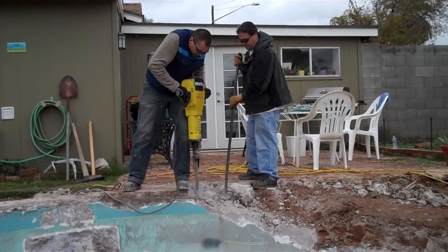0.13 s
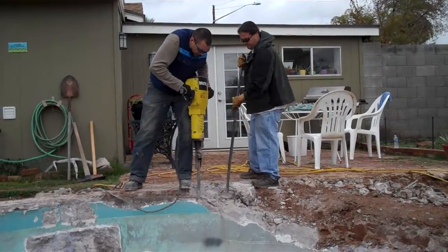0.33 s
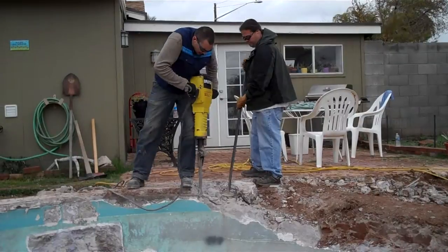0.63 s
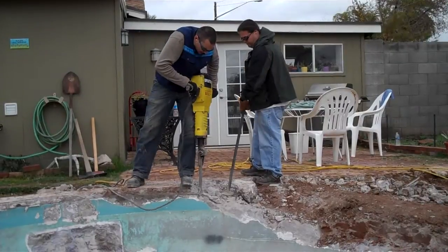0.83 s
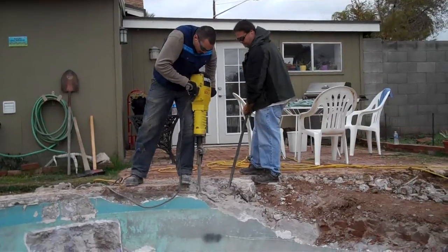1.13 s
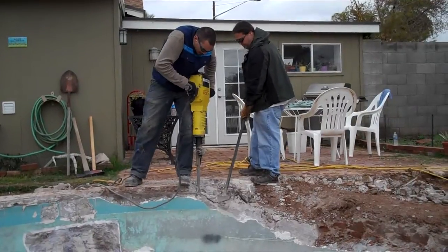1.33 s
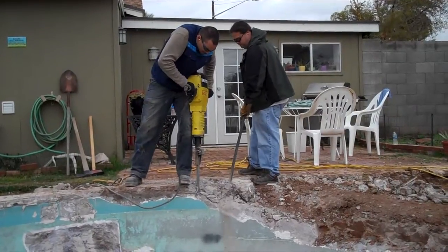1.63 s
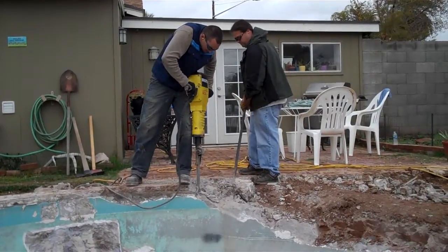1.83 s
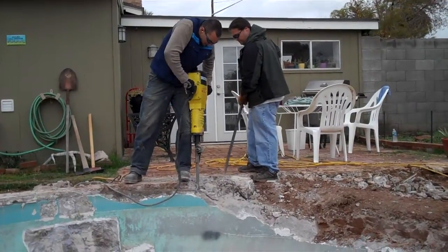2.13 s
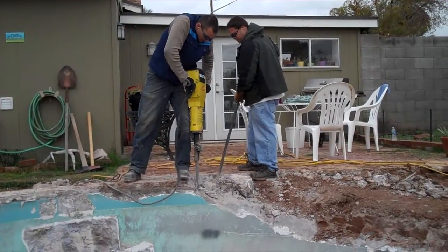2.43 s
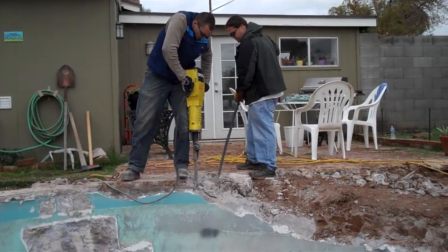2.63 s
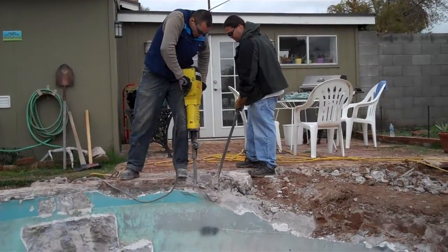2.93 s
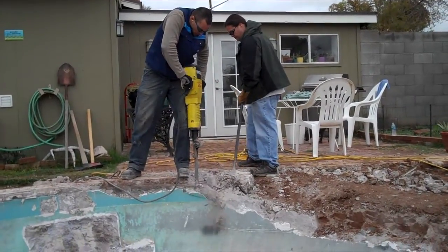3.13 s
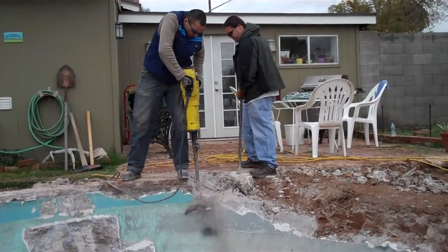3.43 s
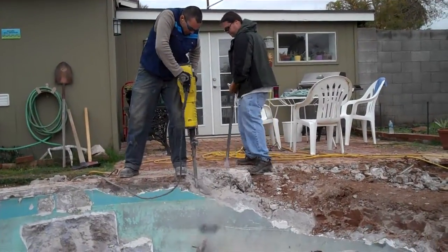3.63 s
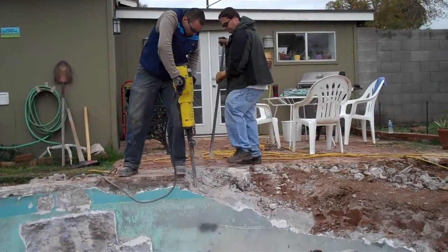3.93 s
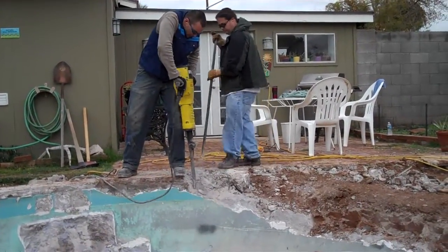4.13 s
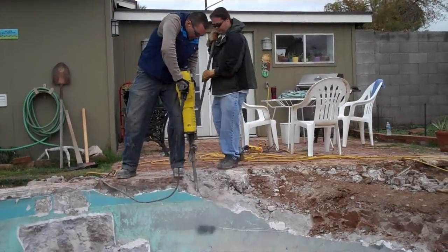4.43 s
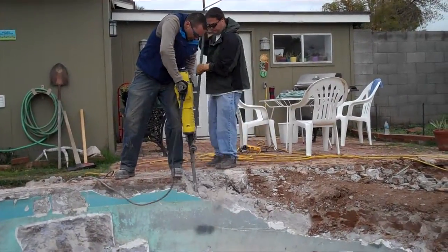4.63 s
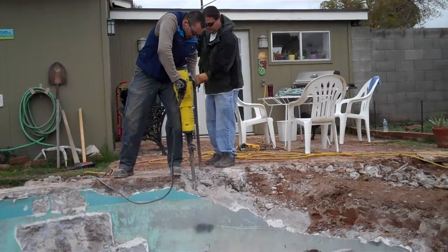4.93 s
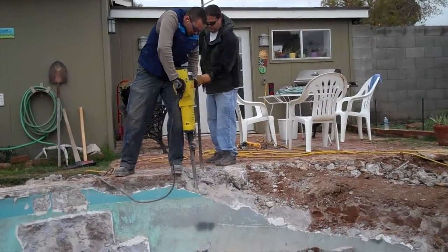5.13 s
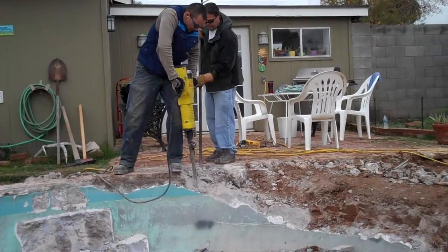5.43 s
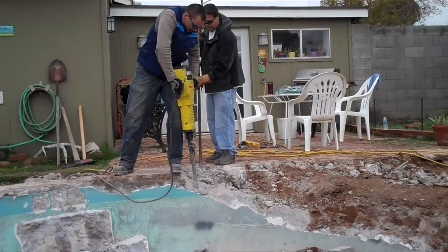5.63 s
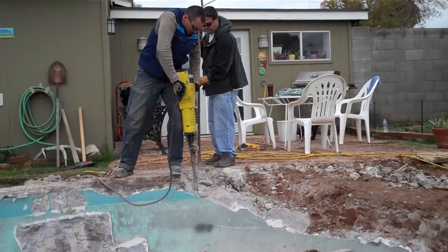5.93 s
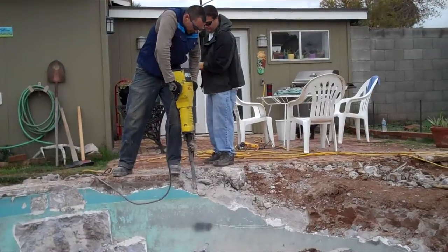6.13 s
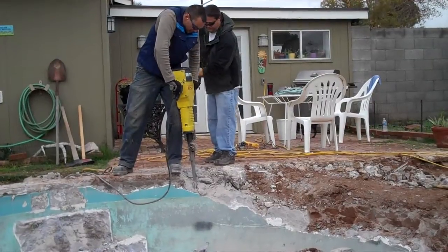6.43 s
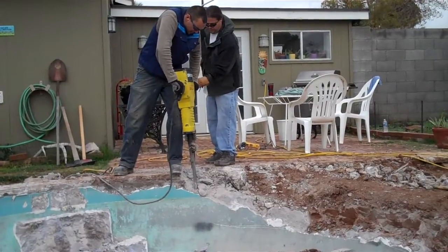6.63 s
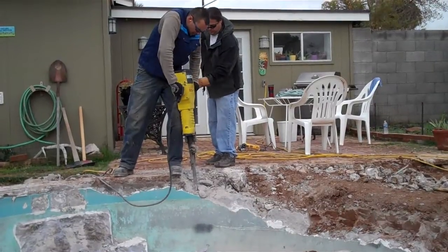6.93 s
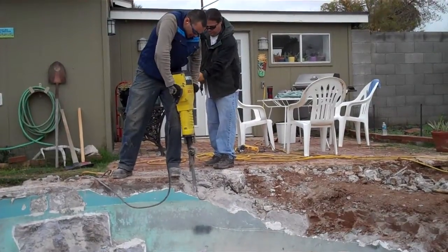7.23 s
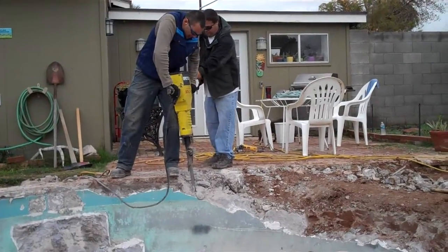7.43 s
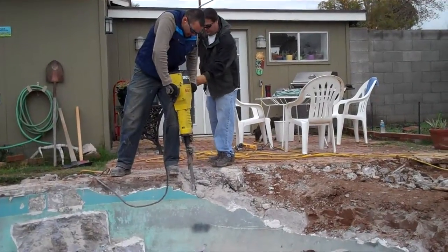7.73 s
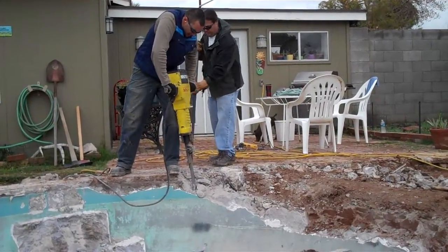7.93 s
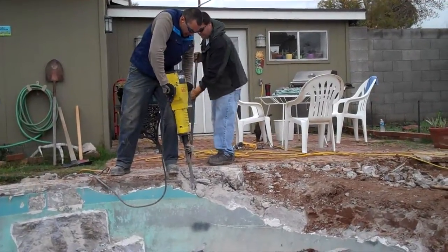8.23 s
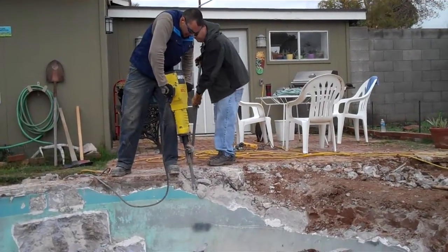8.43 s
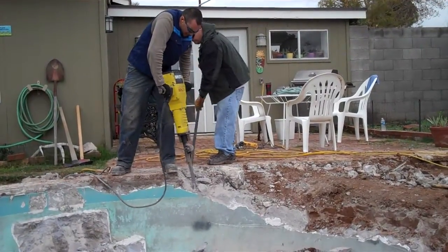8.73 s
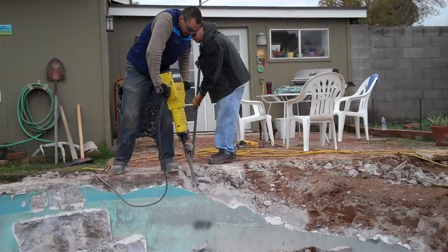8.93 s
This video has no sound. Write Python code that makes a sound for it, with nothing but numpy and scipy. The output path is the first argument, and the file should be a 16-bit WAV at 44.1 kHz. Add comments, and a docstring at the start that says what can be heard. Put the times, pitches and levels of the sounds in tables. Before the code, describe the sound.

An electric jackhammer hammers concrete nonstop in a walled yard, each fast blow slamming, crushing grit and ringing the steel chisel over a motor whirr. The tip skips at first, then bites. Midway it works loose and rings more, while broken chunks knock and low thumps and rumble buffet the microphone. Then it settles into harder blows with a shorter ring.

```python
"""An electric jackhammer breaks a pool's concrete rim in a walled yard, about 15 blows a second.
From the start its motor whirrs, the microphone rumbles, and each echoing blow slams the slab, crushes grit
and rings the steel chisel. The tip starts loose, with a few low thumps, and bites within a second. From
about 3 to 5 seconds it works loose again: broken chunks knock and more low thumps buffet the microphone.
From 6 seconds on it sits in a second hole, slamming hard and ringing only briefly."""
import sys
import numpy as np
from scipy import signal
from scipy.fft import rfft, irfft, next_fast_len
from scipy.io import wavfile

SR = 44100
rng = np.random.default_rng(int(sys.argv[2]) if len(sys.argv) > 2 else 0)


def generate_wav(signal):
    """Clip the signal to [-1, 1] and save it as 16-bit WAV at the path in sys.argv[1]."""
    frames = np.transpose(np.atleast_2d(signal))
    scaled = np.clip(frames, -1, 1) * 32767
    pcm = np.round(scaled).astype(np.int16)
    wavfile.write(sys.argv[1], SR, pcm)


N = 399987
TIME = np.arange(N) / SR


def from_db(db):
    """Turn decibels (dB) into a number to multiply by."""
    return 10 ** (np.asarray(db) / 20)


def dying(age, t60):
    """A fade that drops 60 dB in t60 seconds, and is silent before it starts."""
    return (age >= 0) * np.exp(-np.log(1000) * np.maximum(age, 0) / t60)


def coloured(x, points):
    """Make some pitches louder and others softer, along a curve of (Hz, dB) points."""
    size = next_fast_len(N + SR // 10)
    hz, db = np.transpose(points)
    grid_hz = np.maximum(np.arange(size // 2 + 1) * SR / size, 1)
    gain = from_db(np.interp(np.log(grid_hz), np.log(hz), db))
    return irfft(rfft(x, size) * gain, size)[..., :N]


def stereo_noise(points, likeness):
    """Coloured noise of strength 1. Likeness 1 makes left and right the same, -1 opposite."""
    mid, side = rng.standard_normal((2, N))
    white = np.sqrt(1 + likeness) * mid + np.sqrt(1 - likeness) * side * [[1], [-1]]
    noise = coloured(white, points)
    return noise / np.sqrt(np.mean(noise ** 2) + 1e-20)


def resonance(x, hz, width_hz):
    """Keep the sound near one pitch; the narrower the band, the longer it rings."""
    r = np.exp(-np.pi * width_hz / SR)
    feedback = [1, -2 * r * np.cos(2 * np.pi * hz / SR), r * r]
    return signal.lfilter(np.array([1, 0, -1]) * (1 - r * r) / 2, feedback, x + 1e-18)


def flutter(rate):
    """A random wobble in strength and phase that changes rate times a second."""
    real, imag = rng.standard_normal((2, 8000))
    return np.interp(TIME * rate, np.arange(len(real)), (real + 1j * imag) / np.sqrt(2))


# The tone of the whirr. Each row: pitch in Hz, relative level in dB.
MOTOR_COLOUR = [(25, -7), (60, 0), (120, 0), (170, -0.5), (500, -2.5), (1300, -2.5), (2400, -0.5),
                (3300, -4.5), (6000, -4), (8000, 4), (11000, -31), (15000, -30)]

def motor(level_db=-34.0):
    """Motor, gears and fan make a steady, noisy whirr."""
    return from_db(level_db) * stereo_noise(MOTOR_COLOUR, likeness=0.76)


# How the rumble swells. Each row: time in seconds, relative level in dB.
RUMBLE_LEVELS = [(0, -54), (.55, -51), (1, -71), (3.15, -63), (3.68, -34), (4.05, -49), (4.4, -39),
                 (4.85, -32), (5.15, -37), (5.4, -52), (7.5, -60), (8.2, -48), (8.7, -43), (9.07, -40)]
# Its deep tone. Each row: pitch in Hz, relative level in dB.
RUMBLE_COLOUR = [(15, -4), (35, 11), (80, -29), (150, 0), (300, -33), (1000, -49), (4000, -80)]

def rumble(level_db=-1):
    """Low buffets on the microphone push its left and right openings opposite ways."""
    swell = from_db(level_db + np.interp(TIME, *np.transpose(RUMBLE_LEVELS)))
    return swell * stereo_noise(RUMBLE_COLOUR, likeness=-0.81)


# The hammer's speed shifts with the load. Each row: time in seconds, blows per second.
BLOW_RATE = [(0.0, 15.404), (0.74, 15.373), (1.36, 16.056), (1.94, 15.142), (2.05, 15.495), (3.22, 15.44),
             (3.68, 14.941), (4.29, 15.667), (4.42, 14.952), (4.88, 15.513), (5.62, 15.285), (6.24, 15.656),
             (6.55, 15.981), (6.78, 15.475), (7.05, 15.384), (7.75, 15.568), (8.0, 16.037), (9.07, 15.977)]
# How firmly the tip bites. Each row: time in seconds, slam in dB, ring time in seconds before damping.
BITE = [(0, -27, 0.37), (.25, -32.5, 0.3), (.7, -30.5, 0.18), (1.0, -27, 0.4), (1.55, -25.5, 0.23),
        (1.9, -26.5, 0.27), (2.45, -26, 0.23), (3.05, -27, 0.31), (3.4, -30, .42), (3.75, -32, 0.49),
        (4.2, -30, 0.21), (4.5, -35, 0.45), (4.95, -32.5, 0.34), (5.25, -36, 0.36), (6.0, -27, 0.14),
        (7.2, -28.5, 0.11), (8.1, -25.5, 0.15), (9.07, -30, 0.14)]
# The chisel jumps clear and sings on. Each row: time in seconds, dB added to the loose ring level.
CHISEL_JUMPS = [(.113, -1), (.698, -0.5), (3.206, -1.5), (3.6, -1), (3.733, -1), (3.996, -1.5)]
FIRM_SLAM_DB, LOOSE_SLAM_DB = -26, -33.5   # a tip that bites fully, and one that only skips
FIRM_RING_DB, LOOSE_RING_DB = -6.5, -4   # what the concrete does not take stays in the steel

def blows(slam_scatter_db=1.9, ring_scatter_db=1.15, t60_scatter=0.26, jitter_s=0.00041, jump_t60=0.99):
    """Plan one blow per turn of the crank. A loose tip rings louder and strikes less evenly."""
    turns = np.cumsum(np.interp(TIME, *np.transpose(BLOW_RATE))) / SR
    turns -= np.interp(.0477, TIME, turns)   # time of the first blow, in seconds
    starts = np.interp(np.arange(int(turns[-1]) + 1), turns, TIME)
    times, *columns = np.transpose(BITE)
    slam_db, ring_t60 = [np.interp(starts, times, column) for column in columns]
    loose = np.clip((slam_db - FIRM_SLAM_DB) / (LOOSE_SLAM_DB - FIRM_SLAM_DB), 0, 1)
    uneven = .45 + .55 * loose
    late, harder, louder, longer = rng.standard_normal((len(starts), 4)).T
    slam_db += slam_scatter_db * uneven * harder
    ring_db = FIRM_RING_DB + (LOOSE_RING_DB - FIRM_RING_DB) * loose + ring_scatter_db * louder
    ring_t60 *= np.exp(t60_scatter * uneven * longer)
    for when, extra_db in CHISEL_JUMPS:
        nearest = np.argmin(np.abs(starts - when))
        ring_db[nearest], ring_t60[nearest] = LOOSE_RING_DB + extra_db, jump_t60
    return starts + jitter_s * uneven * late, slam_db, ring_db, ring_t60


# Where the tip sits. Each row: time in seconds, place (-1 first hole, 0 loose, 1 second hole).
TIP_PLACE = [(0, -0.2), (.6, -0.2), (.8, -1.08), (2.85, -0.88), (3.05, -0.48), (3.35, -0.36), (4.0, -0.53),
             (4.7, -0.43), (5.35, -1.15), (5.7, -0.95), (6.1, 0.77), (7.5, 0.68), (9.07, 0.82)]

def seated(levels_db, when):
    """Blend three levels (first hole, loose, second hole) by where the tip sits at these times."""
    place = np.interp(when, *np.transpose(TIP_PLACE))
    return np.interp(place, [-1, 0, 1], levels_db)


# The pitches at which the slab and the hammer's housing shake. Each row: pitch in Hz, width in Hz,
# then relative levels in dB for the first hole, a loose tip and the second hole.
SLAB_TONES = [(200, 169, 0, -3, -1), (126.5, 58, -3, 1, -1.5), (245, 55, -3, -5, 2.5),
              (330, 91, -1.5, -37, 1.5), (496, 184, -4.5, -4.5, -1.5), (725.6, 47, 2.5, -0.5, -6),
              (945, 90, -0.5, -0.5, 1.5), (1283, 124, 2.5, -3.5, 5), (1788, 210, 0.5, -14.5, 4.5),
              (2256, 86, -15, -10.5, 9), (2685, 180, -3, -45, -48), (3340, 100, -1.5, 8.5, -11)]
# The slab passes some pitches on late, rounding the blow. Each row: pitch in Hz, width in Hz.
SLAB_LAGS = [(600, 134), (1400, 4740), (2200, 520)]

def slam(starts, slam_db, level_db=44.5, scatter_db=0.54, lead_s=.0014, band_hz=(38, 3300)):
    """The piston's push shakes housing and slab just before the tip cracks the concrete."""
    at = np.clip(np.round((starts - lead_s) * SR).astype(int), 0, N - 1)
    # the housing's deep tones thud on even when the tip hardly bites
    housing_db = FIRM_SLAM_DB + 0.58 * (slam_db - FIRM_SLAM_DB)
    body = np.zeros(N)
    for hz, width_hz, *levels_db in SLAB_TONES:
        push_db = housing_db if hz < 300 else slam_db
        chance_db = scatter_db * rng.standard_normal(len(at))
        clicks = np.zeros(N)
        clicks[at] = from_db(level_db + push_db + seated(levels_db, starts) + chance_db)
        body += resonance(clicks, hz, width_hz)
    for hz, width_hz in SLAB_LAGS:
        body -= 2 * resonance(body, hz, width_hz)   # later, but no weaker
    return signal.sosfilt(signal.butter(2, band_hz, "band", fs=SR, output="sos"), body)


# The tone of the tip's crack and of the crushed grit. Each row: pitch in Hz, relative level in dB.
CRACK_COLOUR = [(100, -41), (600, -14.5), (2000, -7.5), (3300, -15.5), (4500, -4.5), (5900, -1.5),
                (7200, -2.5), (8400, -9), (10000, -16), (13000, -30), (16000, -34)]
GRIT_COLOUR = [(60, -26), (250, -22), (520, -2), (1300, 11), (2400, 19.5), (3200, 21.5), (4300, 21),
               (5300, 20.5), (6100, 18.5), (6600, 16), (7300, 28.5), (9100, -57), (9900, 19.5),
               (14000, -11)]

def crushing(age, slam_db, ring_db, crack_db=19.0, crack_t60=.015, grit_db=(-4, -6, -7), grit_t60=0.19):
    """A sharp crack under the tip, then a clumpy tail of crushed grit and scraping steel."""
    force_db = .7 * slam_db + .3 * ring_db
    rise = 1 - np.exp(-age / .0004)
    crack = from_db(crack_db + force_db) * dying(age, crack_t60) * rise
    clumps_db = 6.5 * flutter(rate=600).real
    grit = from_db(seated(grit_db, TIME) + (slam_db + ring_db) / 2 + clumps_db) * dying(age, grit_t60)
    return (crack * stereo_noise(CRACK_COLOUR, likeness=0.47)
            + grit * stereo_noise(GRIT_COLOUR, likeness=1.0))


# The tones of the steel chisel. Each entry: pitch in Hz.
STEEL_HZ = [2560, 4187, 4772, 4825, 5404, 6002, 6128, 6165, 7482, 7667, 8034, 8385, 9682, 10276, 10896,
            12700, 13600, 14155]
# Their strengths for each place of the tip. Each entry: relative level in dB of the matching tone.
STEEL_FIRST_HOLE_DB = [-29.5, -13.5, -12.5, -18.5, -18.5, -9, -14.5, -10.5, -17.5, -42, -16, -14.5, -19,
                       -26, -28.5, -29, -38, -21.5]
STEEL_LOOSE_DB = [-25, -11, -11, -31, -17.5, -8.5, -4, -9, -18, -44, -15.5, -14.5, -20, -26.5, -21.5, -28,
                  -21, -35]
STEEL_SECOND_HOLE_DB = [-34, -7.5, -11.5, -30, -30, -4.5, -9.5, -7.5, -13, -30, -21, -11.5, -8, -27, -22,
                        -25, -24, -17]

def chisel(starts, blow, age, ring_db, ring_t60, level_db=-4, damping=0.85, rise_s=0.0018,
           detune_hz=13, scatter_db=2.6, grip_db=(-8, -1, -5), grip_s=0.033):
    """Every blow sets the steel ringing afresh, each tone with a new strength."""
    ring = np.zeros((2, N))
    for hz, *levels_db in zip(STEEL_HZ, STEEL_FIRST_HOLE_DB, STEEL_LOOSE_DB, STEEL_SECOND_HOLE_DB):
        strength, detune, skew, phase = rng.standard_normal((len(starts), 4)).T
        angle = 2 * np.pi * ((hz + detune_hz * detune)[blow] * age + phase[blow])
        gain = from_db(seated(levels_db, starts) + scatter_db * strength)
        rattle = 1 + flutter(rate=200)   # rattling in its holder roughens the ring
        tone = gain[blow] * np.exp(1j * angle) * rattle
        sway = np.exp(0.95j * skew / 2)[blow]   # the swaying bar reaches left and right out of step
        ring[0] += (tone * sway).real
        ring[1] += (tone * sway.conj()).real
    rise = 1 - np.exp(-age / rise_s)
    # the concrete grips a wedged chisel once the tool's weight settles back on it
    choke_db = seated(grip_db, TIME) * np.clip(2 * age / grip_s - 1.5, 0, 1)
    return ring * from_db(level_db + ring_db + choke_db) * rise * dying(age, ring_t60 * damping)


# Pitches that the ground and the pool's edge cancel. Each row: pitch in Hz, width in Hz, dip in dB.
GROUND_DIPS = [(822, 18, -34), (1110, 18, -35), (1523, 66, -16), (1982, 100, -23), (3024, 550, -3),
               (3597, 105, -26)]
# Echoes from the house and wall. Each row: delay in seconds, level in dB.
WALL_ECHOES = [(0.0242, -33.5), (0.035, -43)]

def yard(x, tail_db=-12, tail_delay_s=0.0051, tail_t60=.18):
    """The ground cancels some pitches; walls and furniture add hard echoes and a short, soft tail."""
    age = TIME[:SR // 2]
    scatter = rng.standard_normal((2, len(age))) * dying(age - tail_delay_s, tail_t60)
    scatter /= np.sqrt(np.sum(scatter ** 2, axis=1, keepdims=True))
    for hz, width_hz, db in GROUND_DIPS:
        x = x - (1 - from_db(db)) * resonance(x, hz, width_hz)
    echoes = np.zeros((2, N))
    for delay_s, db in WALL_ECHOES:
        lag = round(delay_s * SR)
        echoes[:, lag:] += from_db(db) * x[:, :-lag]
    tail = from_db(tail_db) * signal.fftconvolve(x, scatter, axes=1)[:, :N]
    return x + echoes + tail


# Low thumps. Each row: start in seconds, relative level in dB.
THUMP_HITS = [(0.178, -17.5), (0.437, -17.5), (0.715, -18), (3.332, -18), (3.535, -19), (3.733, -21),
              (3.862, -21), (4.061, -17), (4.384, -18), (4.72, -14), (4.783, -20.5), (4.922, -18.5),
              (8.625, -30)]
# The tone of their tails. Each row: pitch in Hz, relative level in dB.
THUMP_TAIL_COLOUR = [(15, 5), (45, -0.5), (160, -4), (300, -21), (700, -10), (1200, -16), (4000, -53)]

def thumps(push_db=3, push_hz=65, push_t60=0.039, tail_db=1, tail_t60=0.067, rise_s=0.0026):
    """Low thumps on the microphone: each is a brief, deep push with a rough tail."""
    tails, pushes = np.zeros((2, N))
    age = TIME[:SR // 5]
    for start_s, db in THUMP_HITS:
        at = round(start_s * SR)
        span = slice(at, at + len(age))
        tails[span] += from_db(tail_db + db) * dying(age, tail_t60) * np.minimum(age / rise_s, 1)
        pushes[span] += from_db(push_db + db) * dying(age, push_t60) * np.sin(2 * np.pi * push_hz * age)
    mostly_right = np.array([[0.2], [1]])
    return tails * stereo_noise(THUMP_TAIL_COLOUR, likeness=-0.19) + pushes * mostly_right


# Knocks of broken concrete. Each row: start in seconds, relative level in dB, pitch in Hz.
CHUNK_KNOCKS = [(0.311, -21.5, 400), (2.883, -18, 880), (2.947, -16, 850), (3.012, -14, 820),
                (3.334, -33, 223), (3.734, -17, 700), (3.867, -17.5, 603), (4.191, -26.5, 131),
                (4.386, -21, 325), (4.522, -25, 160), (4.585, -23, 150), (4.654, -22.5, 149),
                (4.849, -23, 170), (5.044, -27, 120)]

def chunks(level_db=4.0, cycles=14, width_share=0.46):
    """A broken chunk knocks on the slab with a short, dull burst; deeper knocks last longer."""
    knocks, age = np.zeros(N), TIME[:SR // 5]
    for start_s, db, hz in CHUNK_KNOCKS:
        noise = rng.standard_normal(len(age)) * dying(age, cycles / hz)
        burst = resonance(noise, hz, width_share * hz)
        at = round(start_s * SR)
        knocks[at:at + len(age)] += from_db(level_db + db) * burst / np.abs(burst).max()
    return knocks


def scene():
    """Blows and knocks echo in the yard; the motor, rumble and thumps are added without echo."""
    starts, slam_db, ring_db, ring_t60 = blows()
    blow = np.maximum(np.searchsorted(starts, TIME, side="right") - 1, 0)   # which blow is sounding
    age = TIME - starts[blow]   # seconds since that blow
    age = np.where(age < 0, age + starts[1] - starts[0], age)   # the hammer is already running
    concrete = slam(starts, slam_db) + chunks() + crushing(age, slam_db[blow], ring_db[blow])
    steel = chisel(starts, blow, age, ring_db[blow], ring_t60[blow])
    return yard(concrete + steel) + motor() + rumble() + thumps()


# The microphone's two openings colour the sound differently. Each row: pitch in Hz, left minus right in dB.
MIC_BALANCE = [(100, -3), (500, -3), (1400, 0), (4200, -1), (5100, -1.5), (6100, -6.5), (6500, -0.5),
               (7300, 11), (9700, 8), (11000, 14.5), (12200, -1), (13600, 23)]
# They also hear it out of step. Each row: pitch in Hz, how far left is ahead in radians.
MIC_PHASE = [(60, -0.8), (125, -0.84), (300, -.33), (550, -0), (1400, 0.53), (2300, -0.13), (4700, -0.62),
             (6100, 0), (7000, 0.5), (9000, -0.84)]

def record(dry, ceiling=1.05, cutoff_hz=14500):
    """The microphone gives each side its own tone and timing, rounds loud peaks and cuts the top treble."""
    left = [(hz, 10 * np.log10(2 / (1 + from_db(-db) ** 2))) for hz, db in MIC_BALANCE]
    right = [(hz, 10 * np.log10(2 / (1 + from_db(db) ** 2))) for hz, db in MIC_BALANCE]
    sides = np.array([coloured(dry[0], left), coloured(dry[1], right)])
    size = next_fast_len(N + SR // 10)
    lead = np.interp(np.arange(size // 2 + 1) * SR / size, *np.transpose(MIC_PHASE))
    shifted = irfft(rfft(sides, size) * np.exp(.5j * lead * [[1], [-1]]), size)[:, :N]
    rounded = ceiling * np.tanh(shifted / ceiling)
    return signal.sosfilt(signal.butter(14, cutoff_hz, fs=SR, output="sos"), rounded)


dry = scene()
out = record(dry)
generate_wav(out)
```